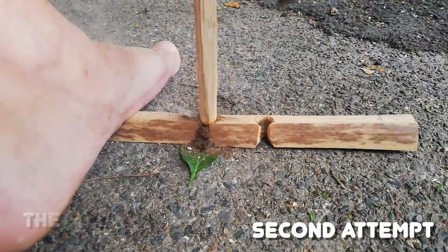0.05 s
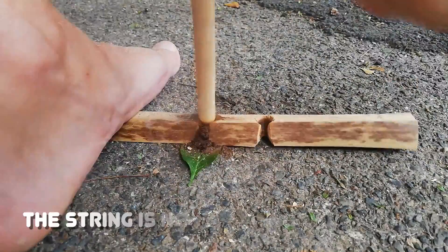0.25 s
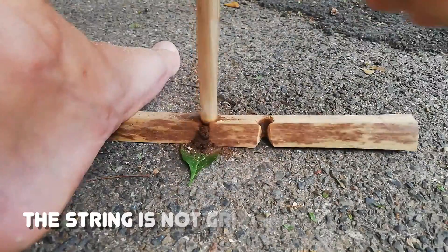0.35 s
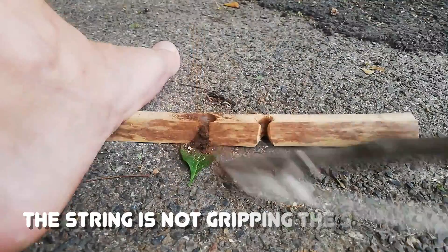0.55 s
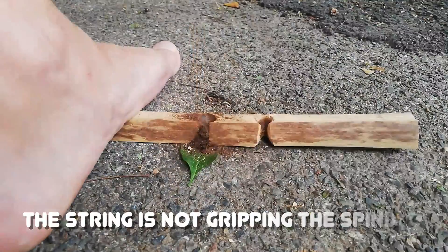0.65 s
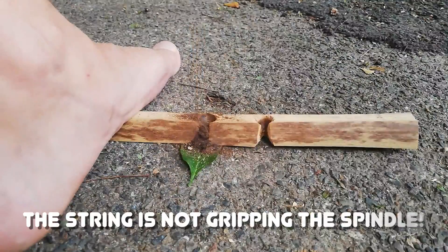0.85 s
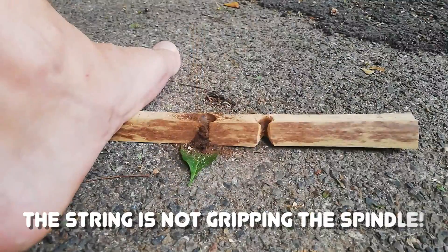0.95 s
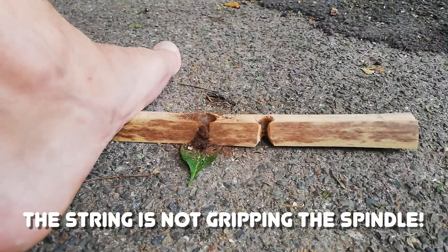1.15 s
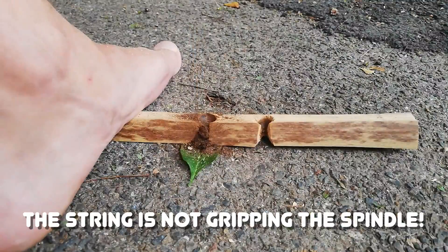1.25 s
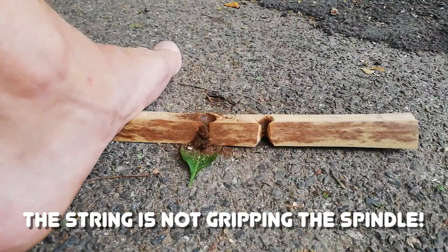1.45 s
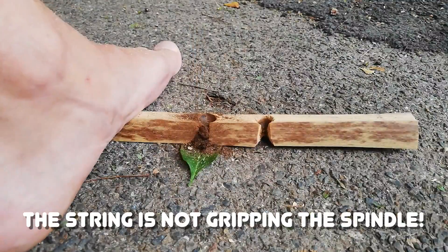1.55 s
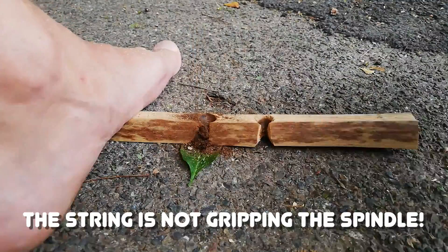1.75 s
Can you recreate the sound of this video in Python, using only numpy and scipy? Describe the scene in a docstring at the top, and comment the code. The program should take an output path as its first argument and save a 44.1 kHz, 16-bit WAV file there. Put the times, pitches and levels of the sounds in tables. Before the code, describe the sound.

A wooden spindle scrapes and squawks against a board, then clatters onto pavement, with insects behind.

```python
"""A bow-drill spindle scrapes in a wooden hearth board, close to the microphone.
It sticks and slips in one short squawk, jumps out, and knocks and clatters over the pavement;
a few faint wooden taps and a soft blip follow. Each catch or blow rings the modes of the wood.
Insects hiss all round, over a low outdoor rumble and, late on, a distant engine."""
import sys
import numpy as np
from scipy import signal
from scipy.fft import rfft, irfft
from scipy.io import wavfile
from scipy.ndimage import uniform_filter1d, map_coordinates

SR = 44100
rng = np.random.default_rng(int(sys.argv[2]) if len(sys.argv) > 2 else 0)


def transcribe(signal):
    """Save signal, clipped to [-1, 1], as a 16-bit WAV file at the path in sys.argv[1]."""
    frames = np.atleast_2d(signal).T
    limited = np.clip(frames, -1, 1)
    pcm = np.round(limited * 32767).astype(np.int16)
    wavfile.write(sys.argv[1], SR, pcm)


N = 79380
TIME = np.arange(N) / SR


def undb(db):
    """Decibels to gain."""
    return 10 ** (np.asarray(db) / 20)


def unit(x):
    """Scale to rms 1."""
    return x / np.sqrt(np.mean(x ** 2))


def curve(rows, column=1):
    """A column of a table, joined by straight lines in time."""
    rows = np.array(rows)
    return np.interp(TIME, rows[:, 0], rows[:, column])


def colour(x, spectrum):
    """Give a noise a spectrum; rms 1."""
    hz, db = np.array(spectrum).T
    bins_hz = np.maximum(np.fft.rfftfreq(N, 1 / SR), 1)
    gain = undb(np.interp(np.log(bins_hz), np.log(hz), db))
    return unit(irfft(rfft(x) * gain, N))


def noise():
    """White noise."""
    return rng.standard_normal(N)


def wander(hz):
    """A smooth random drift; rms 1."""
    hold = int(SR / hz)
    steps = np.repeat(noise()[:N // hold + 1], hold)
    return unit(uniform_filter1d(uniform_filter1d(steps, hold), hold)[:N])


def burst(start, decay_s):
    """An envelope that jumps up and dies away."""
    age = TIME - start
    return (age >= 0) * np.exp(-np.clip(age / decay_s, 0, 60))


def impulse(start):
    """One instant of force."""
    return np.maximum(1 - abs(np.arange(N) - start * SR), 0)


def blow(start, grit_db, grit_s):
    """One impulse followed by a short crunch of grit."""
    return impulse(start) + undb(grit_db) * burst(start, grit_s) * noise()


def contact(force, hz, octaves=0.78):
    """The place and softness of a contact favour one broad band."""
    edges = np.clip(hz * 2 ** (octaves * np.array([-1, 1])), 20, SR / 3)
    return signal.sosfilt(signal.butter(2, edges, "bandpass", fs=SR, output="sos"), force + 1e-18)


def ring(force, modes, rise_s=.0001):
    """Drive decaying modes, each with its own place between left and right."""
    t = np.arange(SR // 4) / SR
    response = sum(undb([[db + pan], [db]]) * np.sin(2 * np.pi * hz * t) * 1000 ** (-t / t60)
                   for hz, db, t60, pan in modes)
    onset = 1 - np.exp(-t / rise_s)
    return signal.fftconvolve(force[None], response * onset, axes=1)[:, :N]


# Dry contact at the left and right microphones (frequency [Hz], relative level [dB])
RASP_LEFT_SPECTRUM = [(300, -27), (1000, 10.5), (3000, 5.5), (6000, 3), (9000, -40), (11000, -13),
                      (15000, -18), (16000, -38)]
RASP_RIGHT_SPECTRUM = [(300, -51), (1000, 10.5), (3000, -66), (6000, 1.5), (9000, 2), (11500, 2),
                       (14500, 10.5), (16000, 11)]

def rasp(force):
    """The bright, dry colour of wood on grit, left and right."""
    return np.array([colour(force, RASP_LEFT_SPECTRUM), colour(force, RASP_RIGHT_SPECTRUM)])


# Rubbing effort at the socket, close by (time [s], level [dB])
RUB_EFFORT = [(0, -11.5), (.085, -11), (.146, -27.5), (.168, -7), (.205, -19.5), (.226, 0.5), (.25, .5),
              (.322, -1.5), (.345, -7.5), (.372, -25), (.395, -10), (.42, -6), (.438, -10.5), (.455, -4.5),
              (.48, -5), (.495, -19), (.55, -20), (.578, -15.5), (.6, -28), (.665, -18.5), (.685, -17.5),
              (.72, -31), (.95, -47)]
# The resonances shift as the spindle leans (time [s], frequency ratio)
LEAN_PITCH = [(0, 1.115), (.09, 1.27), (.17, 1.1), (.42, 1.05), (.455, 1.19), (.5, 1.15)]
# Rubbed wood, to the right (frequency [Hz] before the lean, level [dB], t60 [s], left minus right [dB])
RUBBED_WOOD_MODES = [(730, -0.5, 0.023, -22), (1068, -20, 0.061, -26), (1324, -5, 0.01, -8.5),
                     (1660, -11.5, 0.0087, -0.5), (1920, -13, 0.0081, -7), (2700, -14, 0.039, -25)]

def scrape(catches_per_s=7000):
    """Dense tiny catches of the turning spindle hiss and ring the wood."""
    catches = (rng.random(N) < catches_per_s / SR) * noise() * undb(0.5 * noise())
    upright = ring(contact(catches, hz=1220), RUBBED_WOOD_MODES)
    position = np.cumsum(curve(LEAN_PITCH))  # faster steps raise the resonances
    leaning = np.array([map_coordinates(side, [position], mode="mirror") for side in upright])
    friction = undb([[-38.5], [-29]]) * rasp(catches)
    return undb(curve(RUB_EFFORT)) * (friction + undb(-34.5) * unit(leaning))


# Insects all round the microphone (frequency [Hz], relative level [dB])
INSECT_SPECTRUM = [(1500, -73), (1950, -24), (2200, -10), (2450, -3), (2700, -11), (3050, 0.5), (3350, 0),
                   (3800, -4.5), (4400, -9), (4900, -3.5), (5500, -13), (7000, -14), (8800, -11),
                   (9800, -16), (11000, -29.5), (13000, -40), (16000, -61)]
# Their slow swell (time [s], relative level [dB])
CHORUS_SWELL = [(0, -2), (.15, -1.5), (.5, -1.5), (.77, -0.8), (.88, -0.9), (1.02, 0), (1.12, -.5),
                (1.4, 0.5), (1.8, 0.5)]

def insects(width=.41, pan_db=-1.54):
    """A wide, steady chorus that flickers slightly."""
    mid, side = (colour(noise(), INSECT_SPECTRUM) * undb(0.51 * wander(hz=39.22)) for _ in range(2))
    pair = mid + width * side * np.array([[1], [-1]])
    return pair * undb(-43.5 + curve(CHORUS_SWELL)) * undb([[pan_db / 2], [-pan_db / 2]])


# Low outdoor background, centred (frequency [Hz], relative level [dB])
RUMBLE_SPECTRUM = [(20, -7.5), (45, 4.5), (75, 1), (120, 2), (170, -3.5), (260, -10), (400, -19.5),
                   (700, -53), (1200, -39), (2000, -53), (5000, -105)]
# Its rise and fall (time [s], relative level [dB])
RUMBLE_LEVEL = [(0, -1), (.6, 3.5), (.85, -2), (1.1, -0.5), (1.25, 0), (1.8, 0)]
# Open air at each microphone (frequency [Hz], relative level [dB])
AIR_SPECTRUM = [(100, -13), (300, -3), (520, -13), (680, -14), (820, -12), (1200, -15.5), (2000, -20),
                (12000, -77)]

def outdoors():
    """A low rumble heaves slowly under soft, steady air."""
    rumble_db = -47 + curve(RUMBLE_LEVEL) - 0.23 * wander(hz=7.9)
    rumble = undb(rumble_db) * colour(noise(), RUMBLE_SPECTRUM)
    air = np.array([undb(db) * colour(noise(), AIR_SPECTRUM) for db in (-60, -57.5)])
    return rumble + air


# Faint hiss on both sides (frequency [Hz], relative level [dB])
HISS_SPECTRUM = [(8000, -25), (11000, -2), (13000, -2), (14700, 0), (16000, -6)]

def hiss():
    """A broad, very high hiss that wavers separately left and right."""
    return np.array([colour(noise(), HISS_SPECTRUM) * undb(-73.5 + 2 * wander(hz=11.9))
                     for _ in range(2)])


# Slips in the socket, close by (time [s], body drive [dB], upper-mode drive [dB])
SOCKET_SLIPS = [(.224, -11, -3), (.2347, -18, -8), (.2435, -10, -8), (.2486, -2, 3), (.2591, 1, -3),
                (.2697, -2, 4), (.2804, 0, -3), (.2909, 1, -2), (.3014, 2, -7), (.3127, -2.5, -.5),
                (.323, -8, -3), (.3341, -11, -14)]
# The board under the spindle (frequency [Hz], level [dB], t60 [s], left minus right [dB])
BOARD_BODY_MODES = [(144, -23, 0.23, 2.5), (237.7, -18, 0.065, 0.5), (714.4, 4, 0.054, -22.5),
                    (854, -10.5, 0.045, -12)]
BOARD_UPPER_MODES = [(1140, -7, 0.064, -2.5), (1262, 2, 0.028, 1.5), (1334, 2, 0.032, 0),
                     (1908, -0.5, 0.048, -6.5), (1970, -6.5, 0.029, 6), (2346, -10, 0.042, -15),
                     (2770, -9, 0.032, 4)]

def squawk():
    """The spindle sticks and slips about 95 times a second; each slip rings the board."""
    body_force = sum(undb(db) * blow(s, grit_db=-42, grit_s=.007) for s, db, _ in SOCKET_SLIPS)
    upper_force = sum(undb(db) * blow(s, grit_db=-29, grit_s=.007) for s, _, db in SOCKET_SLIPS)
    body = ring(body_force, BOARD_BODY_MODES, rise_s=0.018)
    upper = ring(contact(upper_force, hz=1570), BOARD_UPPER_MODES, rise_s=0.0022)
    return body + undb(-22) * upper


def clicks(hits):
    """A brief crack for each (time, dB), right of centre, with a faint crumble of grit after it."""
    cracks = sum(undb(db) * (burst(s, .0003) + undb(-29) * burst(s, .003)) for s, db in hits)
    return rasp(noise()) * undb([[-9], [0]]) * cracks


# Dull knocks near the microphone (time [s], ring [dB], contact centre [Hz], click [dB], thump [dB])
WOOD_KNOCKS = [(0.4775, -23.5, 1255, -19, -30), (.4803, -23, 1110, -37, -43), (0.5114, -32, 487, -55, -42),
               (0.5341, -19, 890, -22, -65), (.5590, -25, 634, -30, -43), (.5740, -27, 412, -37, -30),
               (.6180, -19, 2050, -22, -55), (0.623, -26.5, 1190, -20, -39)]
# Knocked wood and the thump beneath it (frequency [Hz], level [dB], t60 [s], left minus right [dB])
KNOCKED_WOOD_MODES = [(297, -14.5, 0.0089, 21.5), (480, -24.5, 0.018, 13), (756, 1.5, 0.0091, -39),
                      (935, -3, 0.0068, -12), (1129, -2, 0.0079, -8), (1470, -11.5, 0.012, 0),
                      (2235, -7.5, 0.025, -32)]
THUMP_MODES = [(81.4, -3.5, 0.11, 0), (128.6, 0.5, 0.089, 0), (228, 2.5, 0.066, 0)]

def knocks():
    """The spindle jumps out and knocks on board and ground."""
    force = sum(undb(db) * contact(blow(s, grit_db=-25, grit_s=.0045), hz)
                for s, db, hz, _, _ in WOOD_KNOCKS)
    weight = sum(undb(db) * impulse(s) for s, _, _, _, db in WOOD_KNOCKS)
    thump = ring(contact(weight, hz=133), THUMP_MODES)
    cracks = clicks([(s, db) for s, _, _, db, _ in WOOD_KNOCKS])
    return ring(force, KNOCKED_WOOD_MODES) + thump + cracks


# Strikes on the pavement nearby (time [s], ring [dB], click [dB])
PAVEMENT_STRIKES = [(.5105, -31, -19), (.6560, -43, -29), (.6700, -32, -11), (.6739, -26.5, -34)]
# The free stick (frequency [Hz], level [dB], t60 [s], left minus right [dB])
SPINDLE_MODES = [(320, -14, .05, 3), (660, -17, .04, -6), (1630, 0, .048, -10), (2680, -7, .038, 6),
                 (3060, -11, .025, -2), (4080, -12, .02, 0), (6000, -18, .015, 0)]

def loose_spindle():
    """The free stick rings as it strikes the pavement."""
    force = sum(undb(db) * blow(s, grit_db=-65, grit_s=.0008) for s, db, _ in PAVEMENT_STRIKES)
    return ring(force, SPINDLE_MODES) + clicks([(s, db) for s, _, db in PAVEMENT_STRIKES])


# Faint taps nearby (time [s], level [dB], contact centre [Hz], share of the full ring time)
WOOD_TAPS = [(.871, -50, 1060, .9), (.959, -54, 1400, 0.59), (1.010, -49.5, 614, 0.7),
             (1.086, -46, 1190, 0.35), (1.139, -48.5, 1490, 0.91), (1.213, -50, 997, 0.22),
             (1.242, -53.5, 750, 1), (1.353, -45.5, 1500, 0.7), (1.449, -51.5, 1500, 0.66),
             (1.640, -53.5, 1110, 0.34), (1.672, -55, 1000, .2)]
# The tapped wood (frequency [Hz], level [dB], full t60 [s], left minus right [dB])
TAPPED_WOOD_MODES = [(410, -4, 0.014, 10.5), (686, 3.5, 0.084, -46), (900, 4, 0.015, -10),
                     (1290, -9, 0.021, -10), (1590, -10, 0.045, 7.5)]

def taps(detune=.04):
    """Gritty wooden taps once the clatter is over; each is damped and tuned a little differently."""
    out = 0
    for s, db, contact_hz, ring_share in WOOD_TAPS:
        modes = [(hz * (1 + detune * rng.standard_normal()), level, t60 * ring_share, pan)
                 for hz, level, t60, pan in TAPPED_WOOD_MODES]
        force = contact(blow(s, grit_db=-19, grit_s=.008), contact_hz)
        out = out + undb(db) * ring(force, modes)
    return out


# An engine far from the microphone (time [s], pitch [Hz], level [dB])
ENGINE_RUN = [(1.15, 95.7, -85), (1.3, 97.4, -44), (1.412, 100.3, -40.5), (1.46, 110.6, -42),
              (1.52, 117.1, -61), (1.58, 110.5, -51.5), (1.73, 109.2, -43), (1.8, 116, -53)]

def engine():
    """A far engine gathers speed: an unsteady hum with a weak second harmonic."""
    hz = curve(ENGINE_RUN) * (1 + 0.0214 * wander(hz=30.95))
    phase = 2 * np.pi * np.cumsum(hz) / SR
    hum = unit(np.sin(phase) + undb(-21.5) * np.sin(2 * phase))
    return hum * undb(curve(ENGINE_RUN, column=2) + 1.5 * wander(hz=25.44))


def blip(start_s=1.5405, length_s=.014, from_hz=300, to_hz=1350):
    """One soft, drip-like blip that glides quickly upward."""
    progress = np.clip((TIME - start_s) / length_s, 0, 1)
    hz = from_hz * (to_hz / from_hz) ** progress
    return undb(-50.5) * np.sin(np.pi * progress) * np.sin(2 * np.pi * np.cumsum(hz) / SR)


def surroundings(direct, echo_db=-16):
    """A brief scatter from the pavement and things nearby, different at each microphone."""
    tail = np.array([noise(), noise()]) * burst(0.0017, decay_s=.007)
    tail = tail / np.sqrt(np.sum(tail ** 2, axis=1, keepdims=True))
    return direct + undb(echo_db) * signal.fftconvolve(direct, tail, axes=1)[:, :N]


def scene():
    """Close sounds and their reflections in front, the outdoor background behind."""
    close = scrape() + squawk() + knocks() + loose_spindle() + taps() + blip()
    return surroundings(close) + insects() + outdoors() + hiss() + engine()


def record(dry):
    """The recorder cuts the top steeply above 15.8 kHz."""
    return signal.sosfilt(signal.ellip(10, .2, 80, 15800, fs=SR, output="sos"), dry)


dry = scene()
out = record(dry)
transcribe(out)
```